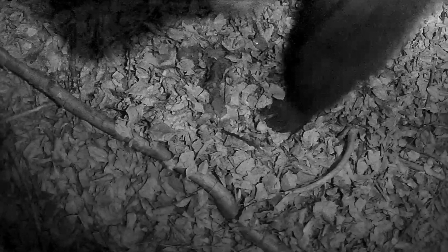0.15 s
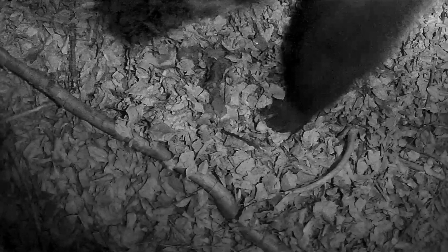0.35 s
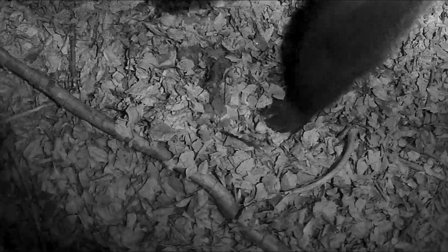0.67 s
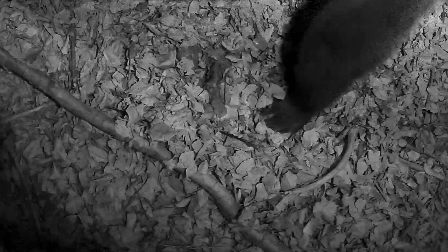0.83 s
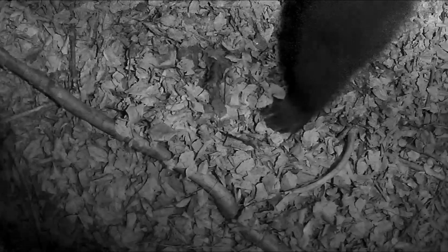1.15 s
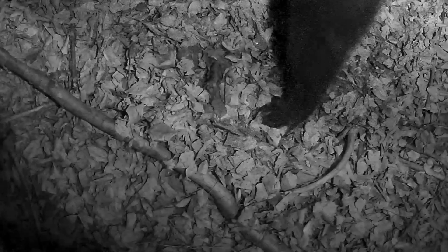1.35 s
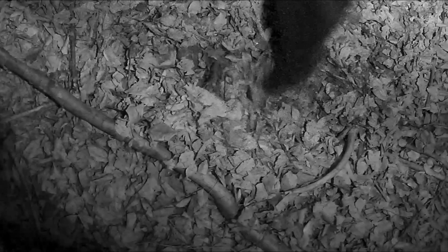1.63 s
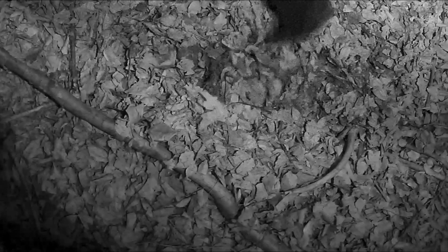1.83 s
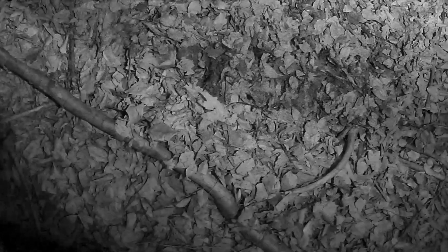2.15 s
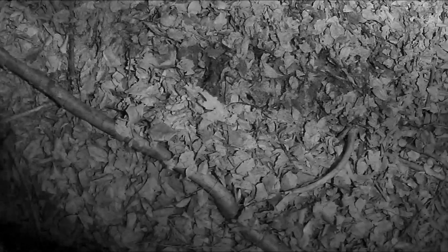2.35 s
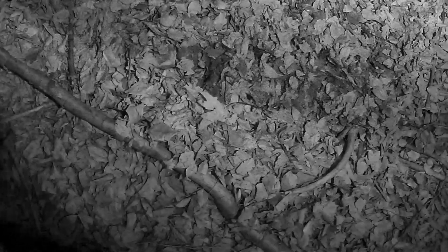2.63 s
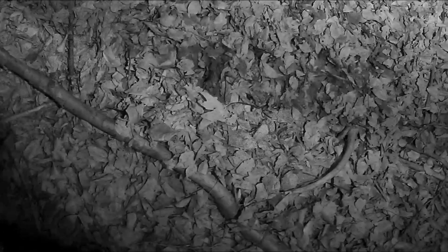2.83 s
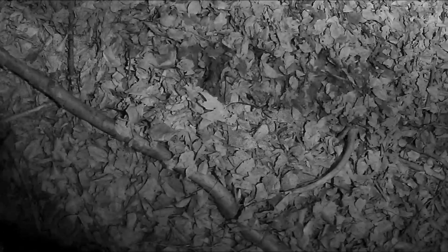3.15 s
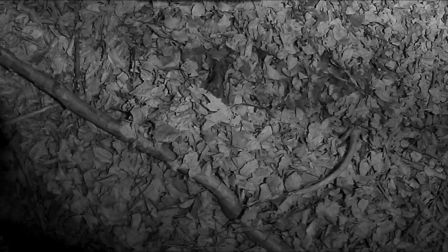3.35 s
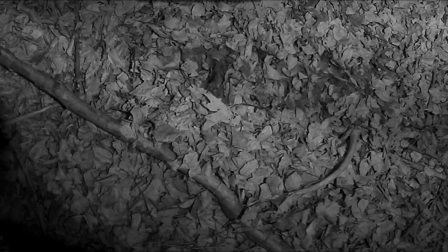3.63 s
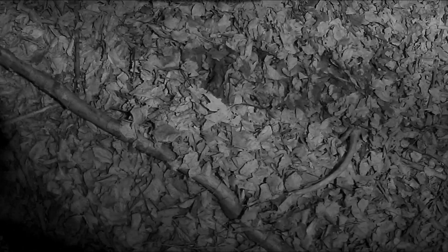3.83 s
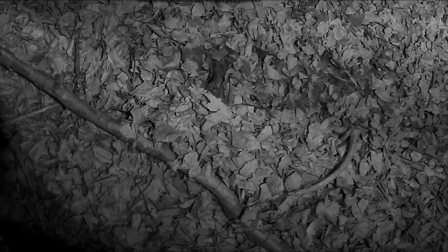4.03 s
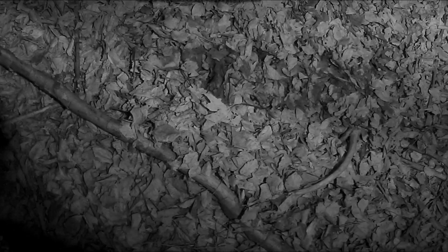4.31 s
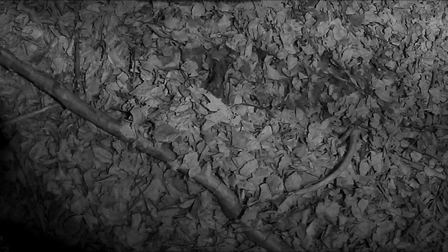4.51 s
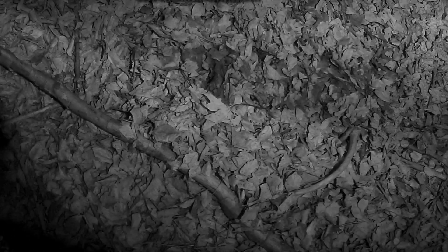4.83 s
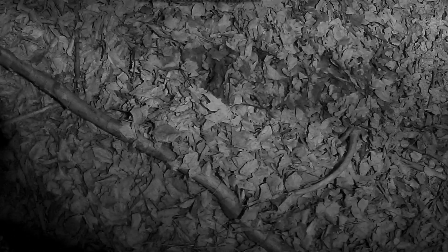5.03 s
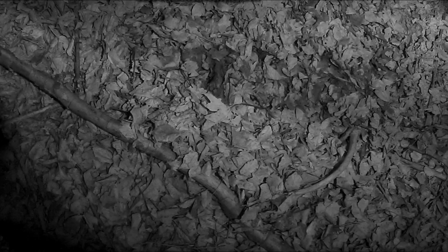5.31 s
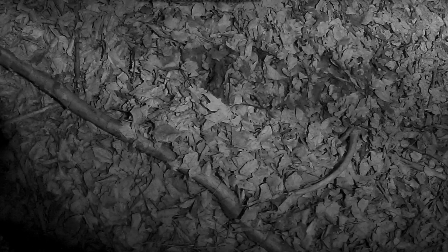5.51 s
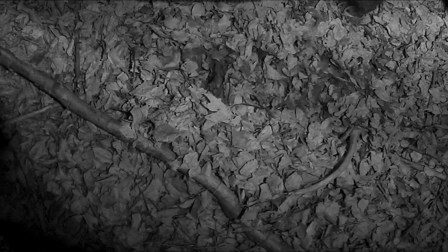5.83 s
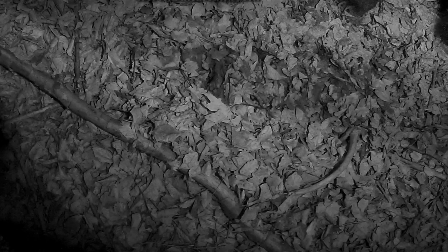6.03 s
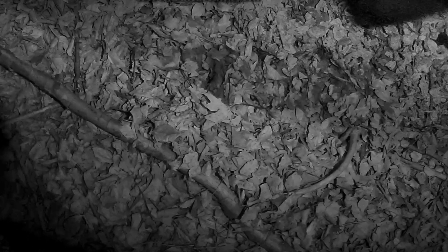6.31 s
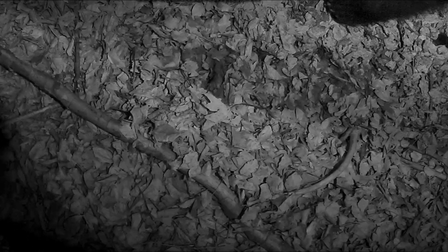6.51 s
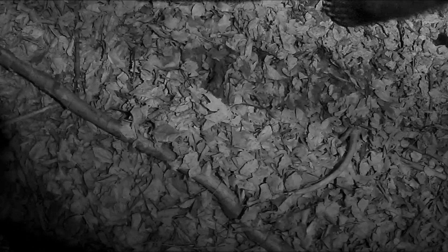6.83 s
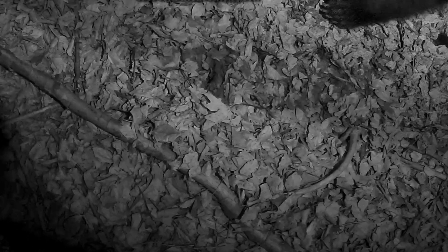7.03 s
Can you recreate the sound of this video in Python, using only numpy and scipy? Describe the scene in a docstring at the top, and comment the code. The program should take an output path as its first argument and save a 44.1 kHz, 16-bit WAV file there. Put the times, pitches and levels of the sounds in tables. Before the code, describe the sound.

A close, dry outdoor sound in woodland, with constant faint hiss and a hollow low rumble from the microphone. At 0.1 s a hard, very short knock clacks the plastic case amid slight leaf rustle; then it is nearly quiet, with tiny ticks from 0.8 s. At about 1.3 s a bear's paw crunches suddenly into dry leaves, a strong burst at 1.4 s. Scraping crackle swells again around 1.7-2.1 s, with soft dull rubs against the case between 1.6 and 2.4 s and sharp twig snaps around 2.2-2.8 s. The loudest, crispest surge comes at 2.95 s. From 3 to 5 s brittle rustling rolls in uneven swells, with scattered snaps and dull soil thuds. It thins near 5 s, swells at 5.5 s, and pushes again at 5.8-6.5 s, before dying to small ticks and hiss by about 6.8 s.

```python
"""Dry leaves crackle in dense clusters as a bear shuffles and paws through them, right beside a trail camera.
The leaves are thousands of random clicks that ring and echo, louder and denser under each push of a paw.
Twigs snap as short noisy clicks with a ring; soft noise makes the paws' thuds and the rubs on the case,
and one knock rings the case as a set of fading tones.
Behind it all lies the microphone's own steady hiss and hollow rumble, made of filtered noise."""
import sys
import numpy as np
from scipy import signal
from scipy.fft import rfft, irfft
from scipy.io import wavfile
from scipy.ndimage import uniform_filter1d, minimum_filter1d, map_coordinates

SR = 44100
rng = np.random.default_rng(int(sys.argv[2]) if len(sys.argv) > 2 else 0)


def generate_wav(signal):
    """Clip the signal to [-1, 1] and save it as 16-bit WAV at the path in sys.argv[1]."""
    frames = np.transpose(np.atleast_2d(signal))
    scaled = np.clip(frames, -1, 1) * 32767
    pcm = np.round(scaled).astype(np.int16)
    wavfile.write(sys.argv[1], SR, pcm)


N = 315756
TIME = np.arange(N) / SR

# a paw presses or drags through the leaves; crisp top leaves add treble, the packed layer adds body:
# (time of greatest weight [s], level [dB], rise [s], fall [s], treble [dB], body [dB])
PUSHES = [(0.071, -33, 0.074, 0.055, -6, 1), (0.241, -36, 0.033, 0.11, -24, -11),
          (0.488, -34.5, 0.022, 0.026, -3.0, -9), (1.276, -18.5, 0.035, 0.05, -4, 0.5),
          (1.366, -11.5, 0.019, 0.049, -1, -1.5), (1.483, -23.5, 0.026, 0.019, 2.0, 3),
          (1.714, -22, 0.068, 0.42, -2.5, -3.5), (1.835, -18, 0.061, 0.023, -4, 2),
          (2.043, -14.0, 0.068, 0.095, 0.5, 0.5), (2.298, -22.5, 0.175, 0.065, 3.5, 5),
          (2.582, -17.5, 0.244, 0.05, -1.5, -1), (2.678, -20, 0.034, 0.027, -2, -1),
          (2.757, -20.5, 0.027, 0.11, 2.5, 1), (2.949, -9, 0.067, 0.03, 4.5, 3.0),
          (3.021, -17.0, 0.02, 0.013, 0, 6), (3.259, -17.5, 0.35, 0.15, 1.5, 0.5),
          (3.619, -22.5, 0.12, 0.026, 1.5, 3), (3.742, -15.5, 0.049, 0.026, 4, 0.5),
          (3.898, -17.5, 0.16, 0.13, 0.5, 0.5), (4.173, -18, 0.097, 0.11, -0.5, 1.5),
          (4.345, -13.5, 0.07, 0.046, -2, 0.5), (4.415, -16.5, 0.028, 0.119, 2.5, 3),
          (4.728, -17.5, 0.165, 0.059, 3.5, 0.5), (4.906, -24.5, 0.153, 0.079, 0.0, -0.0),
          (5.463, -16.5, 0.14, 0.18, 4.5, 2), (5.836, -17.5, 0.028, 0.109, -1, 0),
          (5.962, -17.5, 0.029, 0.056, 2, 3.5), (6.288, -15.0, 0.086, 0.134, 1.0, -3.5),
          (6.452, -14.0, 0.052, 0.032, -2, -2.5)]
# leaves stirring under the bear's shifting weight between pushes: (time [s], level [dB])
STIRRING = [(.7, -47.5), (1.6, -27), (2.7, -35.5), (5.2, -26.5), (6.5, -24), (6.85, -44.5)]
PUSH_SHAPE = 1.5  # 1 is a pointed swell, 2 a rounded one


def pushes():
    """Each push swells and lets go; its power adds to the stirring. Gives level, treble and body in dB."""
    power = undb(curves(STIRRING)[0]) ** 2
    treble = body = 0
    for s, db, rise_s, fall_s, treble_db, body_db in PUSHES:
        away = np.maximum((s - TIME) / rise_s, (TIME - s) / fall_s)
        push = undb(db) ** 2 * np.exp(-2 * np.minimum(away, 10) ** PUSH_SHAPE)
        power = power + push
        # the strongest push at each moment decides most of the tone
        treble = treble + treble_db * push
        body = body + body_db * push
    return 10 * np.log10(power), treble / power, body / power


# while the bear moves right beside the camera; each change is gradual and centred on its time
CLOSE_FROM_S, CLOSE_UNTIL_S, MOVE_S = 0.7, 2.94, .4


def closeness():
    """1 while the bear moves right beside the camera, 0 before and after."""
    return np.clip(np.minimum(TIME - CLOSE_FROM_S, CLOSE_UNTIL_S - TIME) / MOVE_S + .5, 0, 1)


# colour of the crackle, strongest near 3-4 kHz: (frequency [Hz], level [dB per Hz])
LEAF_COLOUR = [(100, -35), (400, -22.5), (750, -17), (1000, -19.5), (1600, -12.5), (2300, -9.5), (2850, -1),
               (3880, -1), (4200, -7), (4750, -12), (6000, -16), (6800, -24), (7700, -43.5), (11000, -54),
               (15500, -68.5)]
# the crackle arrives again off the foreleg: (time [s], lag [ms], strength [0-1])
LEG_ECHO = [(1.1, 0.47, 0.15), (1.39, 0.52, 0.4), (1.75, 0.89, 0), (2.06, 0.614, 0.18), (2.4, 0.52, 0.36),
            (2.6, 0.55, .45), (2.85, 0.646, 0.14), (3.3, 0.79, 0.14), (3.8, 0.82, 0.05)]
GROUND_ECHO, GROUND_LAG_MS = 0.2, .419  # strength 0-1 and lag of the ground's echo while the bear is close


def leaves(push_db, treble_db, body_db, rate=4000, crowding=.6, scatter_db=2.0, cluster_db=0.78,
           cluster_rate=170, ring_width_hz=600, turn_db=2.5, turn_rate=35):
    """A harder push breaks more leaves; cracks come in clusters and leaves ring briefly at many pitches."""
    # rate is in cracks a second, for a push of -21 dB
    cracks = rate * undb(push_db + 21) ** crowding
    pitches = np.linspace(1200, 6600, 12)  # Hz
    rings = 0
    for hz in pitches:
        ring = resonate(fractures(cracks / len(pitches), scatter_db), hz, ring_width_hz)
        # leaves of different sizes come under the paw in turn
        rings = rings + ring * undb(turn_db * walk(turn_rate))
    crackle = fractures(cracks, scatter_db) + .9 * unit(rings)
    crackle = colour(crackle * undb(cluster_db * walk(cluster_rate)), LEAF_COLOUR)

    treble = band(crackle, 4800, 18000)
    body = band(crackle, 1100, 2200)
    crackle = crackle + (undb(treble_db) - 1) * treble + (undb(body_db) - 1) * body

    # close echoes cut notches in the tone; those of the foreleg slide as its lag changes
    leg_lag_ms, leg = curves(LEG_ECHO)
    ground_echo = GROUND_ECHO * closeness() * delayed(crackle, GROUND_LAG_MS)
    leg_echo = leg * delayed(crackle, leg_lag_ms)
    return even(crackle + ground_echo + leg_echo, .045) * undb(push_db)


# twigs and leaf ribs snapping; the level is that of the whole snap's energy packed into 3 ms:
# (time [s], level [dB], ring pitch [Hz], ring over crack [dB])
SNAPS = [(0.7797, -29.5, 2610, 2), (0.9853, -23, 3300, -18), (1.0503, -26, 3560, -9),
         (1.068, -24, 2830, -1), (1.151, -28, 2600, 8), (1.1912, -21, 2500, 11), (1.349, -16, 3400, -2),
         (1.7242, -12.5, 3470, 9), (2.2135, -10.5, 3380, -6), (2.303, -10.5, 3120, -7),
         (2.4166, -15.5, 3540, -1), (2.6737, -13.5, 3540, -1), (2.7309, -10.5, 3180, -2),
         (2.7872, -17, 3000, -3), (2.998, -11, 3160, 0), (3.4109, -14, 3500, -6), (3.8683, -14.5, 3880, 0),
         (3.9094, -11, 3660, 3), (4.1677, -10, 3550, -7), (4.172, -17, 2130, 3), (4.4235, -13, 2250, 3),
         (4.9072, -19, 3100, 6), (5.2352, -17, 3730, -2), (5.5332, -11, 3900, -1), (5.6741, -19.5, 3690, 2),
         (6.4537, -11.5, 3160, 1), (6.5962, -22.5, 3480, 2), (6.6617, -26, 3900, 4),
         (6.7512, -20.5, 3130, 3), (7.1168, -29.5, 3110, -3)]


def snaps(splinter_s=0.0035, splinters=0.22, ring_s=.00055, ring_top_hz=6800):
    """Each snap is one clean break; the twig rings for a few cycles while splinters follow."""
    t = TIME[:512]
    soften = signal.butter(4, ring_top_hz, fs=SR, output="sos")
    out = np.zeros(N)
    for s, db, hz, ring_db in SNAPS:
        crack = splinters * rng.standard_normal(len(t)) * np.exp(-t / splinter_s)
        crack[0] += 1  # the clean break
        crack = colour(crack, LEAF_COLOUR, size=1024)[:len(t)]
        ring = signal.sosfilt(soften, np.cos(2 * np.pi * hz * t) * t * np.exp(-t / ring_s))
        burst = unit(crack) + undb(ring_db) * unit(ring)
        burst *= undb(db) * np.sqrt(.003 * SR / np.sum(burst ** 2))
        start = int(s * SR)
        out[start:start + len(burst)] += burst[:N - start]
    return out


# dull thud: its level under an ordinary push, and the dB it grows per dB of push
SOIL_DB, SOIL_GROWTH, ORDINARY_PUSH_DB = -38, 0.98, -17
SOIL_HZ, SOIL_WIDTH_HZ = 346, 240
# the bear's bulk stirring beside the case
BULK_DB, BULK_HZ, BULK_WIDTH_HZ = -43.5, 232, 110


def thuds(push_db):
    """The soil thuds with the weight on the paw; close by, the bear's bulk adds a low rumble."""
    soil_db = SOIL_DB + SOIL_GROWTH * (push_db - ORDINARY_PUSH_DB)
    soil = dull_noise(SOIL_HZ, SOIL_WIDTH_HZ) * undb(soil_db)
    bulk = dull_noise(BULK_HZ, BULK_WIDTH_HZ) * undb(BULK_DB) * closeness()
    return soil + bulk


# the bear's body rubs the case; length runs from the top of the swell to where it has nearly gone:
# (time of the swell's top [s], level [dB], length [s], centre [Hz], width [Hz])
RUBS = [(1.611, -36, 0.027, 447, 200), (1.674, -39, 0.07, 594, 80), (1.835, -38.5, 0.038, 750, 350),
        (2.217, -28, 0.052, 470, 100), (2.279, -33.5, 0.04, 475, 220), (2.325, -36, .31, 278, 199)]


def rubs():
    """Soft contacts with the case: swells of dull noise, some narrow enough to have a pitch."""
    out = np.zeros(N)
    for s, db, length_s, hz, width_hz in RUBS:
        swell = np.exp(-2 * ((TIME - s) / length_s) ** 2)
        rub = dull_noise(hz, width_hz) * swell
        # chance makes some noise louder: give every rub the energy of its swell
        out += rub * undb(db) * np.sqrt(np.sum(swell ** 2) / np.sum(rub ** 2))
    return out


# a sharp knock on the case, before the limiter: (time [s], peak level [dB])
KNOCK = (0.1081, 0.95)
# what the case rings with: (frequency [Hz], level [dB], time to fade by 60 dB [s])
CASE = [(317, -10.5, 0.017), (504, -14, .012), (1000, -12, 0.0031), (1680, -23, 0.018), (2640, 4, 0.0049),
        (3020, 3, 0.0051), (3120, -5.5, 0.015), (3930, -2.5, 0.012), (4470, -8.5, 0.009),
        (5100, -0.5, 0.0025), (6000, -19, 0.012)]


def knock():
    """One hard tap rings the plastic case for a few milliseconds."""
    s, db = KNOCK
    t = np.maximum(TIME - s, 0)
    ring = 0
    for k, (hz, mode_db, t60) in enumerate(CASE):
        fade = undb(mode_db - 60 * np.minimum(t / t60, 10))
        # every other tone starts the opposite way
        ring = ring + (-1) ** k * fade * np.sin(2 * np.pi * hz * t)
    ring = signal.sosfilt(signal.butter(6, [150, 6600], "band", fs=SR, output="sos"), ring)
    return ring / abs(ring).max() * undb(db)


# colour of the microphone's own noise: (frequency [Hz], level [dB per Hz])
FLOOR = [(25, -44), (70, -32.5), (105, -22.5), (170, -6), (250, -1.5), (360, 0), (500, -8.5), (750, -16.5),
         (1100, -20), (2200, -13), (4500, -20.5), (6600, -23.5), (7200, -33), (7900, -58), (12000, -74.5)]
FLOOR_DB = -36  # rms of the hiss and rumble


def floor():
    """Steady hiss with a hollow rumble from the case, as filtered noise."""
    return unit(colour(rng.standard_normal(N), FLOOR)) * undb(FLOOR_DB)


def undb(db):
    """Decibels to gain."""
    return 10 ** (np.asarray(db) / 20)


def unit(x):
    """Scale to rms 1."""
    return x / np.sqrt(np.mean(x ** 2))


def curves(table):
    """The columns of a table as lines through time."""
    s, *columns = np.transpose(table)
    return [np.interp(TIME, s, c) for c in columns]


def walk(rate):
    """Random wander of spread about 1, in straight steps, rate a second."""
    return 1.2 * np.interp(TIME * rate, np.arange(N // 20), rng.standard_normal(N // 20))


def resonate(x, hz, width_hz):
    """A damped resonance, gain 1 at its centre."""
    return signal.lfilter(*signal.iirpeak(hz, hz / width_hz, fs=SR), x)


def dull_noise(hz, width_hz):
    """Noise through one resonance twice, rms 1."""
    return unit(resonate(resonate(rng.standard_normal(N), hz, width_hz), hz, width_hz))


def colour(x, points, size=4096):
    """Filter through (Hz, dB) points that never sounds early, so that clicks keep their sharp fronts."""
    hz, db = np.transpose(points)
    grid_hz = np.fft.rfftfreq(size, 1 / SR)
    log_gain = np.log(undb(np.interp(np.log(grid_hz + 1), np.log(hz), db)))
    # folding the cepstrum gives the filter with the earliest possible response
    cepstrum = irfft(log_gain)[:size // 2]
    cepstrum[1:] *= 2
    response = irfft(np.exp(rfft(cepstrum, size)))
    return signal.fftconvolve(x, response)[:N]


def fractures(rate, scatter_db):
    """Clicks at random moments and of uneven size, rate a second; more clicks make each one smaller."""
    chance = np.minimum(rate / SR, 1)
    size = undb(scatter_db * np.minimum(rng.exponential(size=N), 4)) * rng.choice([-1, 1], N)
    return unit((rng.random(N) < chance) * size / np.sqrt(chance))


def band(x, low_hz, high_hz):
    """One band of a sound, kept in step with the rest."""
    return signal.sosfiltfilt(signal.butter(2, [low_hz, high_hz], "band", fs=SR, output="sos"), x)


def delayed(x, lag_ms):
    """The same sound a moment later; the lag may move."""
    return map_coordinates(x, [np.arange(N) - lag_ms * SR / 1000], order=3)


def even(x, window_s):
    """Hold the running rms at 1, so that only the fine grain is left."""
    return x / np.sqrt(uniform_filter1d(x ** 2, int(window_s * SR)))


def scene():
    """Everything at one microphone."""
    push_db, treble_db, body_db = pushes()
    bear = leaves(push_db, treble_db, body_db) + snaps() + thuds(push_db)
    return (bear + rubs() + knock() + floor())[None]


TOP_HZ = 15800  # where the very top is cut


def record(dry, recover_s=.025, bend=0.059):
    """A limiter ducks just ahead of the loudest peaks, the amplifier bends them, and the very top is cut."""
    excess = np.maximum(abs(dry[0]) / .97, 1)
    hold = max(int(recover_s * SR), 128)
    # the largest excess nearby, held from just before the peak until well after it
    held = -minimum_filter1d(-excess, hold, origin=hold // 2 - 20)
    limited = dry / uniform_filter1d(held, size=32)
    bent = limited - bend * limited ** 3
    return signal.sosfilt(signal.ellip(8, .2, 70, TOP_HZ, fs=SR, output="sos"), bent)


dry = scene()
out = record(dry)
generate_wav(out)
```